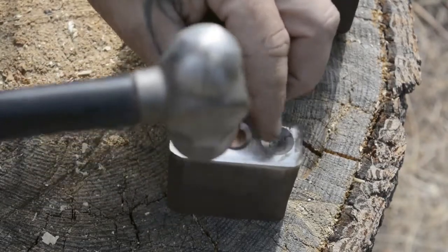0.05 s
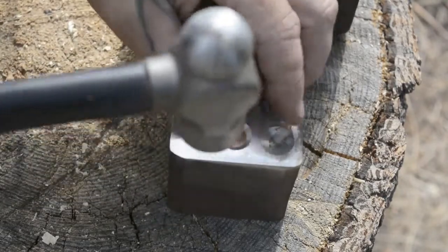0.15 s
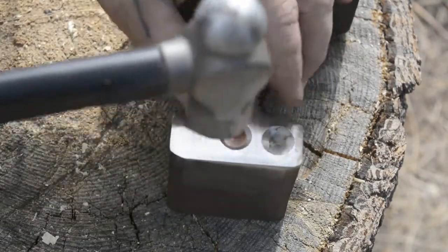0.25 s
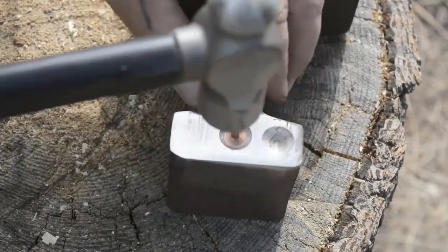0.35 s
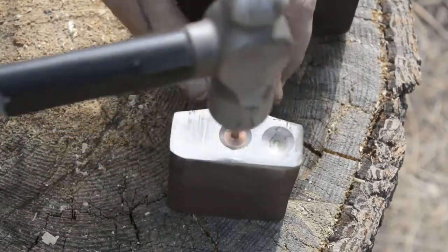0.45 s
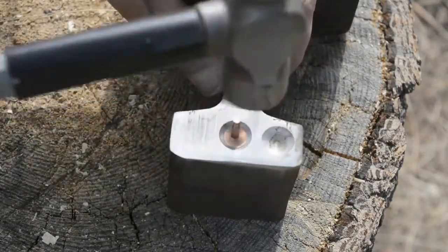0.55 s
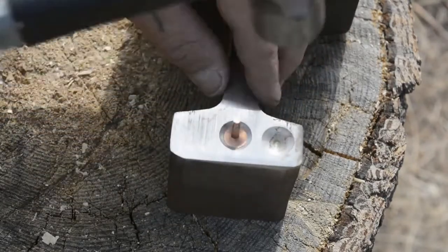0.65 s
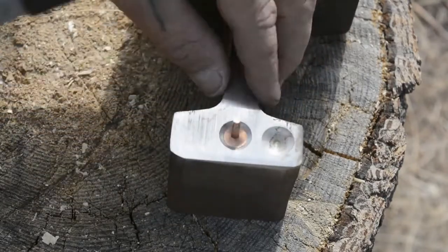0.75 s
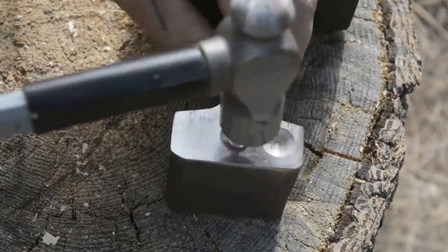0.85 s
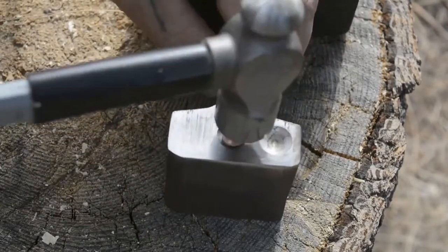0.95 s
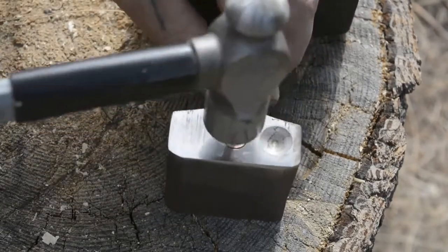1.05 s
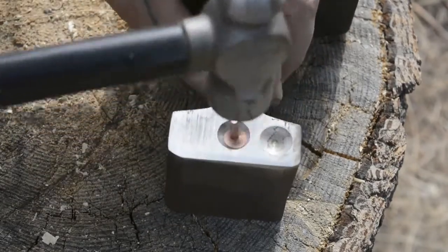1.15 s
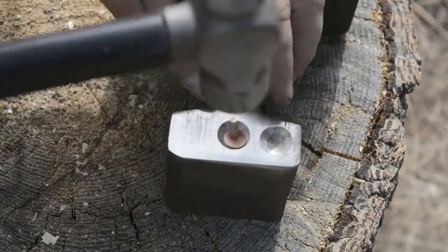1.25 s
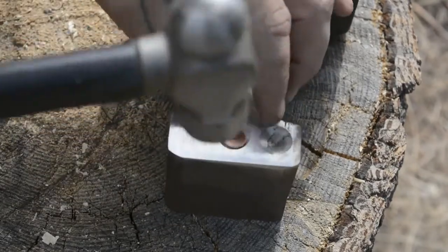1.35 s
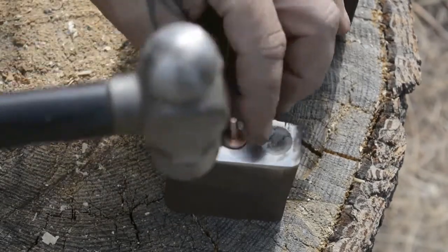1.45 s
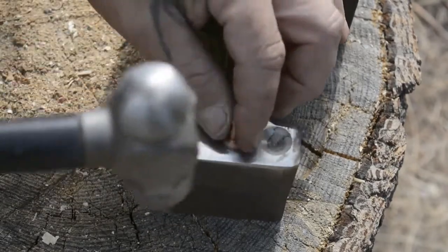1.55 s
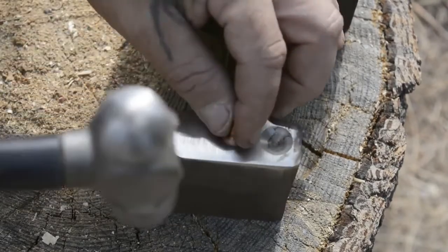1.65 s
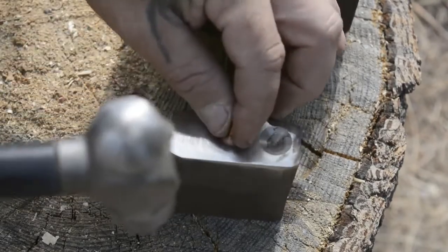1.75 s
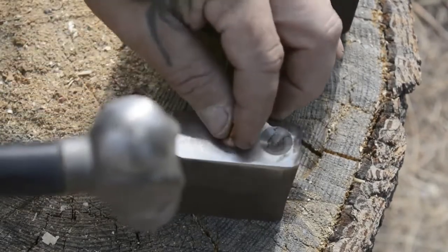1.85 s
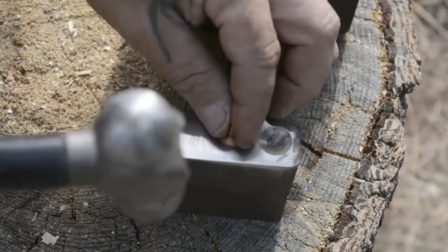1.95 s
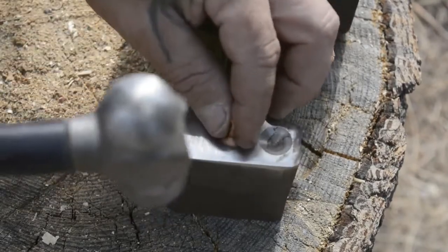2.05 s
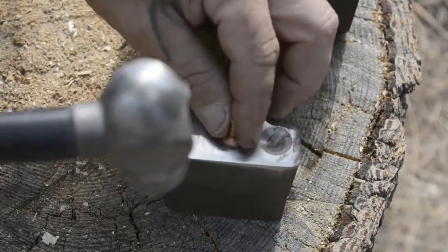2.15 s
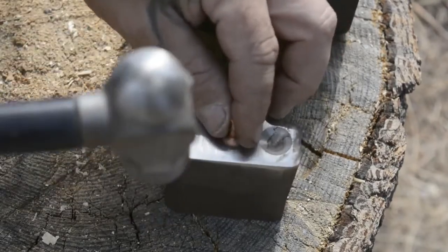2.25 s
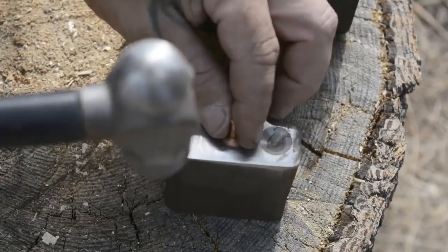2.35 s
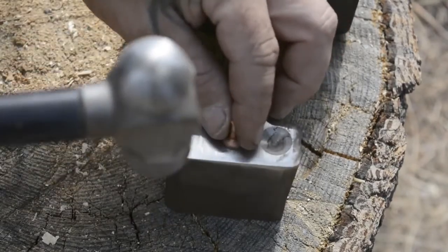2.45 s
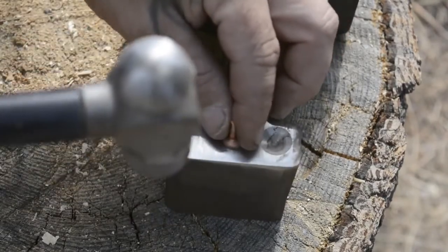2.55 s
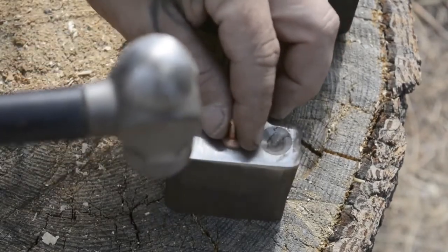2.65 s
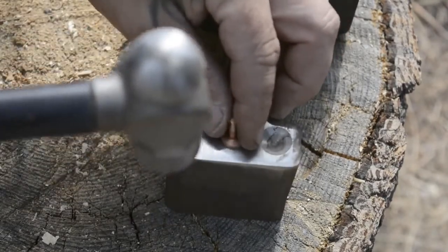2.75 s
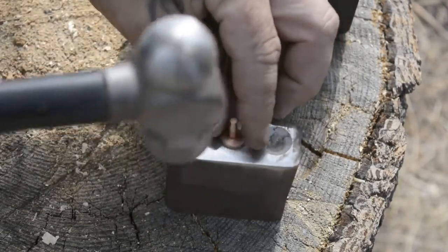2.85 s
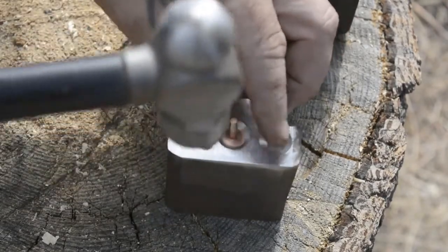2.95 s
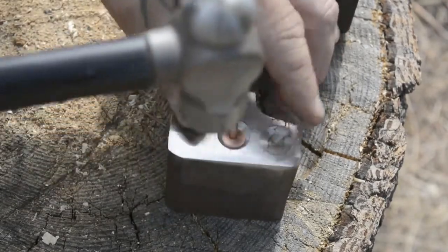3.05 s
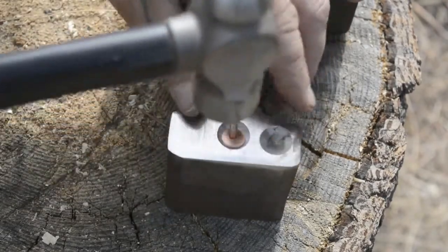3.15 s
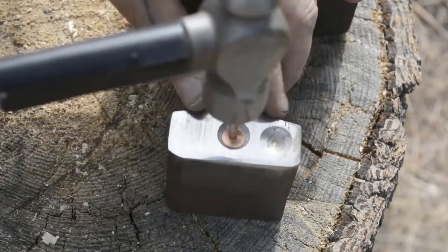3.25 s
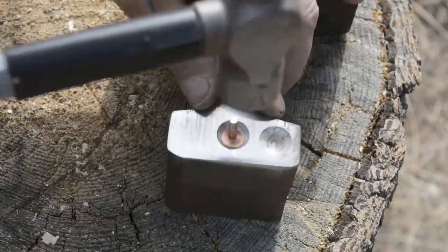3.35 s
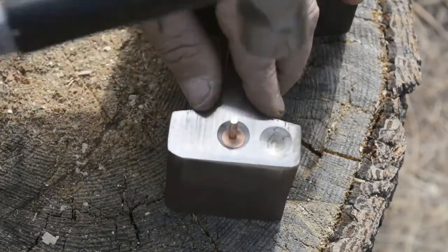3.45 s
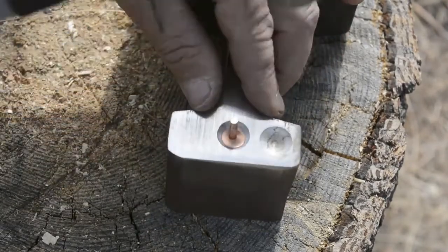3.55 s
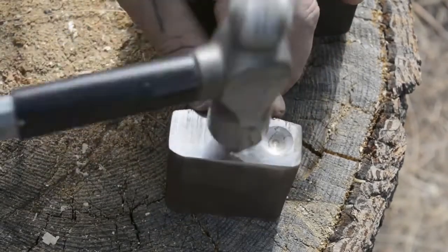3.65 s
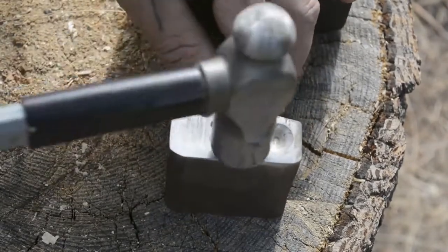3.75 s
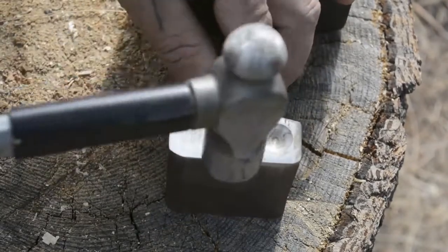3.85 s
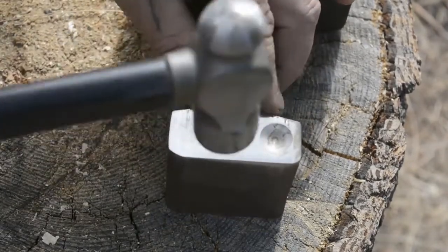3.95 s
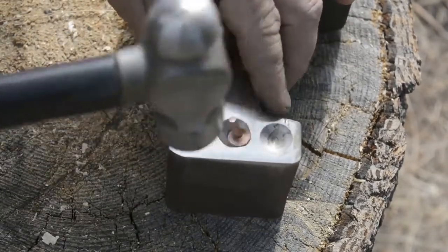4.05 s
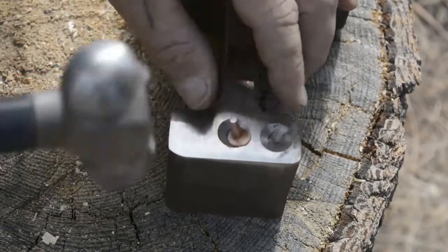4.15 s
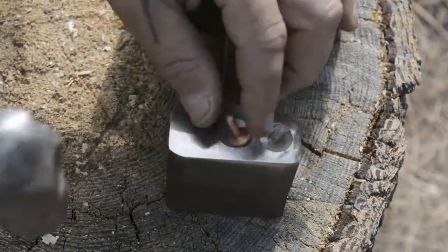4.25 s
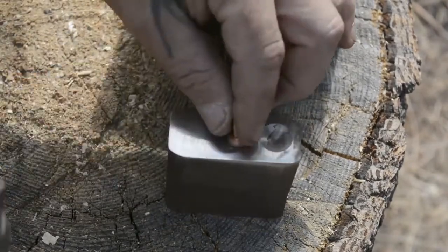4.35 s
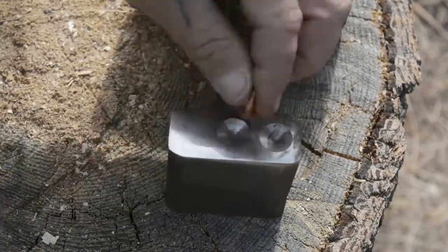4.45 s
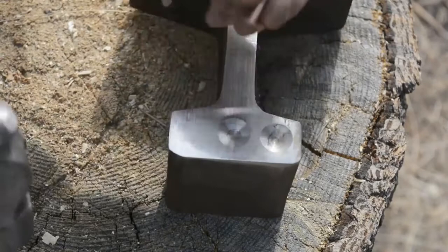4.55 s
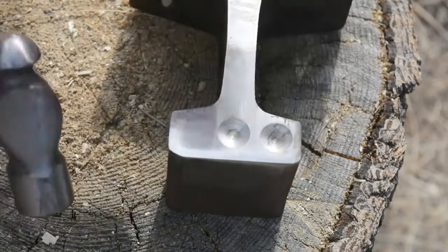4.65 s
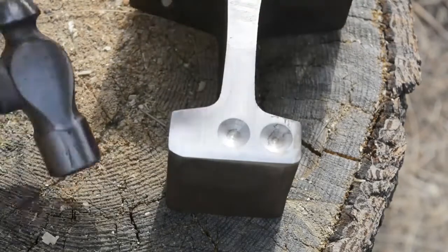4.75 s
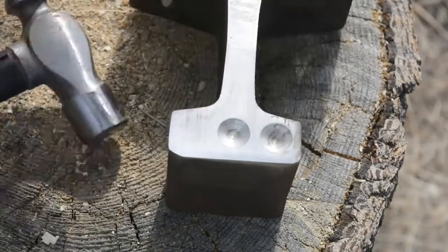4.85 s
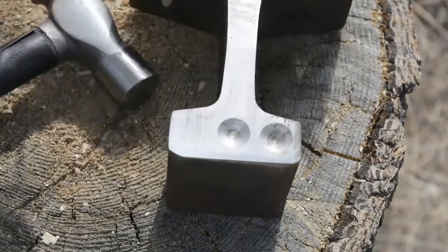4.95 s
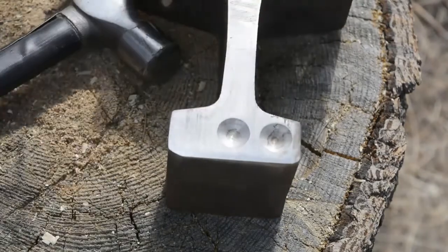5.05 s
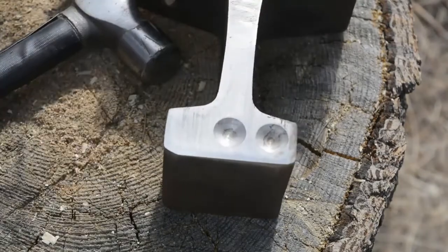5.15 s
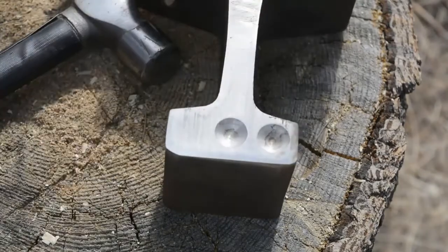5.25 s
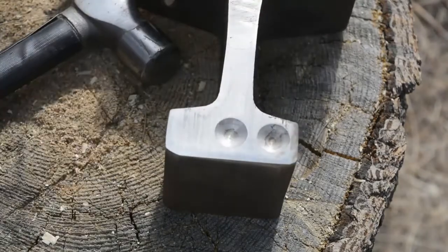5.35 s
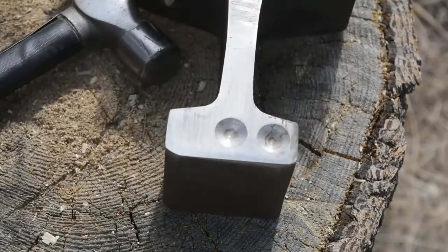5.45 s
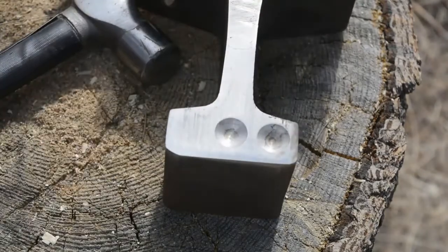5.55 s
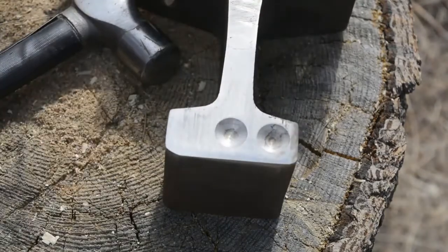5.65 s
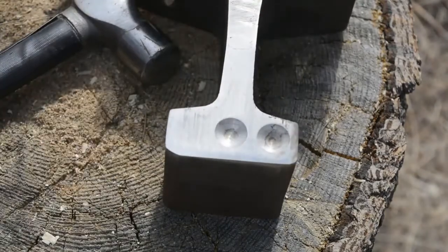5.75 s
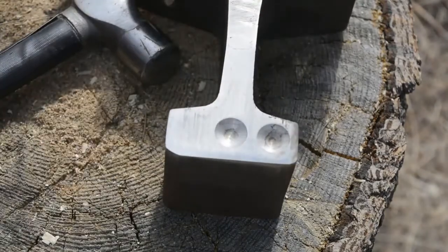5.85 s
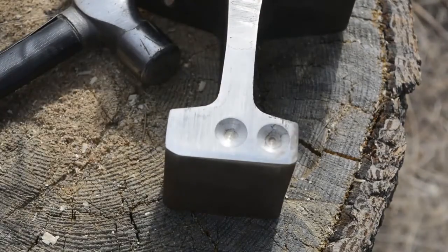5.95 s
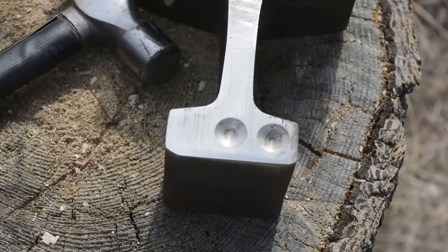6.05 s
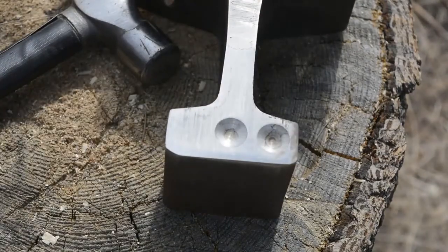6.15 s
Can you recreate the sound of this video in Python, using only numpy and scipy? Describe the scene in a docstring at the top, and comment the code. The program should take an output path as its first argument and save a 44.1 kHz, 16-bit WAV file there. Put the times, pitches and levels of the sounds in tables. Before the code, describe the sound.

A bird whistles faintly, a hammer cracks down twice on a steel block on a stump, then is set down with a knock and long ring.

```python
"""Soft outdoor hiss and a faint whine run throughout, with low bumps; first a far bird whistles, a falling sine.
A steel hammer then strikes a small rivet in a steel block on a tree stump, twice, with a spell of hum after each.
Each blow is a noise crack, damped block and wood modes and a beating hammer ring; the block bounces, the rivet rattles.
Last, the hammer is laid down with knocks and rings freely, and a sleeve rustles as swelling noise."""
import sys
import numpy as np
from scipy import signal
from scipy.fft import rfft, irfft
from scipy.io import wavfile

SR = 44100
rng = np.random.default_rng(int(sys.argv[2]) if len(sys.argv) > 2 else 0)


def wav_out(sig):
    """Save sig, one row per channel (or a flat mono array), as 16-bit PCM at SR to the path in sys.argv[1]."""
    wavfile.write(sys.argv[1], SR, np.round(np.clip(np.atleast_2d(sig).T, -1, 1) * 32767).astype(np.int16))


N = 273420
T = np.arange(N) / SR

# Background air spectrum. Each row: frequency in Hz, relative density in dB per Hz.
AIR = [(12, -61), (20, -1.5), (95, -3.5), (113, -6.5), (145, -6.5), (209, -12), (284, -10.5), (317, -12.5),
       (386, -13.5), (637, -14), (996, -16.5), (2370, -20), (10100, -22), (13700, -21.5), (15800, -23.5)]
# Stereo width of the background. Each row: frequency in Hz, side filter gain in dB.
AIR_SIDE = [(60, -20), (200, -11), (700, -9.5), (2400, -5.5), (8000, -3.5), (15000, -5)]
# Sleeve strokes. Each row: loudest moment in seconds, half length in seconds, level in dB before its flutter.
RUSTLE = [(5.62, .1, -56.5), (5.908, .32, -55), (5.913, .035, -55.5)]
# Sleeve spectrum. Each row: frequency in Hz, relative density in dB per Hz.
SLEEVE = [(500, -7.5), (3000, -17), (9000, -16), (12000, -9.5), (13800, -6), (16000, -9.5)]
# Spells of faint hum. Each row: start in seconds, end in seconds, mean pitch in Hz, fundamental's level in dB.
HUMS = [(1.82, 2.4, 142.3, -59.5), (4.82, 5.446, 144.2, -59)]
# Low bumps at the microphone. Each entry: loudest moment in seconds.
BUMPS = [.331, .375, 3.299, 3.339, 4.299, 5.519]
# Falling whistles of far birds. Each row: loudest moment in seconds, half length in seconds, level in dB,
# pitch curve as points of seconds and Hz.
WHISTLES = [(0.718, .082, -52.5, [(.6, 3350), (.68, 2900), (.75, 2700), (.81, 1850)]),
            (0.61, .07, -61, [(.57, 2020), (.605, 1630), (.72, 1400)])]
# Brief scuffs of metal and wood. Each row: loudest moment in seconds, half length in seconds, level in dB,
# centre in Hz, width in Hz.
SCUFFS = [(3.7135, .003, -47, 4500, 3000), (3.725, 0.0022, -40, 6000, 2000),
          (3.7255, 0.0022, -41, 11000, 4000), (5.745, 0.025, -51, 700, 1500),
          (5.8145, .0012, -46.5, 7000, 5000)]
# Hammer blows. Each row: start in seconds, thud in dB, contact in ms, crack in dB, rivet pitch in Hz,
# rivet width in Hz, rivet level in dB, ring tilt in dB per octave, sideways share of the blow in dB.
BLOWS = [(0.8517, -1, 0.24, -12.5, 5300, 1280, -12.5, 0, -32),
         (3.6688, -2.2, 0.15, -12.5, 5800, 1200, -10.5, -5, -25)]
# The block's hops, one row per blow: first flight in seconds, first landing in dB, loss per bounce in dB,
# first contact in ms.
HOPS = [(0.0503, -8.5, 0.5, 0.61), (0.041, -8.5, 5, 0.76)]
# Block modes on its seat. Each row: frequency in Hz, relative level in dB, t60 in seconds.
BLOCK = [(253, -27, 0.051), (484, -16.5, 0.044), (642, -15.5, 0.042), (794.4, -6.5, 0.042),
         (896, -29.5, 0.077), (1086, -15, 0.04), (1420, -11, 0.018), (1686, -19.5, 0.049)]
# Dead thud of the wood under the block. Each row: frequency in Hz, relative level in dB, t60 in seconds.
THUD = [(379, 0.5, 0.0077), (1202, -7, 0.013), (1880, -14, 0.01)]
# Stump top where the hammer lands. Each row: frequency in Hz, relative level in dB, t60 in seconds.
WOOD = [(500, -31, 0.043), (700, -15, 0.065), (1030, 1.5, 0.005), (1340, -12, 0.0091), (3180, -6.5, 0.0086)]
# Dull knocks as things shift on the stump. Each row: start in seconds, level in dB, pitch in Hz.
KNOCKS = [(5.1398, -29, 500), (5.5445, -41, 890), (5.5748, -28, 160), (5.7488, -31.5, 380)]
# Loud rivet ticks also nudge the block. One row: level in dB, contact in ms.
NUDGE = (-22.5, 0.59)
# Crack spectrum. Each row: frequency in Hz, relative density in dB per Hz.
CRACK = [(1100, 2), (1700, 2), (2400, -1.5), (3200, 0.5), (4200, -14), (7000, -12), (7700, -16), (8500, -3),
         (11000, -6), (13000, -4), (14200, -21), (16000, -28)]
# The rivet's loudest ticks. Each row: start in seconds, level in dB, centre in Hz.
TICKS = [(.8846, -34, 10700), (0.889, -31, 11800), (.8996, -21, 12900), (.959, -27.5, 12400),
         (3.714, -34, 10300)]
# Fainter rivet rattle after each blow. One row: delay in seconds, length in seconds, mean level in dB,
# middle pitch in Hz, width in Hz.
RATTLE = (0.04, 0.06, -41, 9500, 5000)
# Hammer modes. Each row: frequency in Hz, level in dB when struck on the face, level in dB when knocked on the side,
# t60 in seconds in the hand before the grip closes, t60 in seconds lying free, beat in Hz.
HAMMER = [(1710.6, -54, -30.5, 2.1, 1.66, 1.095), (2297, -31.5, -47, 0.85, 3.7, 0.11),
          (4705, -51, -51.5, 0.85, 1.6, 1.45), (5970, -52, -52.5, 2.3, 1.2, 1.14),
          (7192, -41, -63, 0.75, .6, 1.8), (7970, -63, -52, .6, 1.4, 1.4), (9700, -62, -79, .55, .6, 1),
          (11597, -63, -77, .9, .9, 1)]
# The hammer drops back with a glancing, bright touch. One row: start in seconds, sideways level in dB,
# face level in dB, ring tilt in dB per octave.
REBOUND = (3.7262, -16.5, -30, 11)
# The hammer is laid down. One row: start in seconds, knock in dB, ring in dB.
LAY_DOWN = (5.0715, -18.5, 0)
# The laid hammer settles and rings again softly. One row: start in seconds, ring in dB.
SETTLE = (5.5153, -22)

BUMP_DB, JOLT_DB, AIR_DB = -44, -33, -52.5
# each flight is this share of the last, down to the rocking period; each contact is this much longer
RESTITUTION, ROCK_S, SOFTENING = 0.462, 0.0075, 1.34
KNOCK_T60_S, KNOCK_CONTACT_MS = 0.012, 0.17
TICK_WIDTH_HZ = 1400
TOP_HZ = 15850


def undb(db):
    """Decibels to gain."""
    return 10 ** (np.asarray(db) / 20)


def fade(t, t60):
    """Exponential decay, 60 dB down after t60 seconds."""
    return np.exp(-np.log(1000) * t / t60)


def swell(s, half_s):
    """A smooth rise and fall around time s."""
    return np.exp(-((T - s) / half_s) ** 2)


def add(track, s, sound):
    """Mix a sound into the track at time s."""
    i = int(round(s * SR))
    track[i:i + len(sound)] += sound[:N - i]


def colour(x, points):
    """Filter by a spectrum of (Hz, dB) points, joined on a logarithmic frequency axis."""
    hz, db = np.transpose(points)
    f = np.maximum(np.fft.rfftfreq(len(x), 1 / SR), 1)
    gain = undb(np.interp(np.log(f), np.log(hz), db))
    return irfft(rfft(x) * gain, len(x))


def noise(points, size):
    """Coloured noise of rms 1."""
    x = colour(rng.standard_normal(size), points)
    return x / x.std()


def resonance(hz, width_hz):
    """Spectrum points of one steep-sided peak."""
    f = np.geomspace(1000, SR / 2, 128)
    return np.column_stack([f, -20 * np.log10(1 + 2 * ((f - hz) / width_hz) ** 2)])


def air():
    """Steady outdoor air and hiss: independent coloured noise for mid and side."""
    return np.array([undb(AIR_DB) * noise(AIR, size=N) for _ in range(2)])


def sleeve():
    """Cloth strokes: mid and side noise under shared swells with a slow random flutter."""
    strokes = sum(undb(db) * swell(s, half_s) for s, half_s, db in RUSTLE)
    flutter = undb(noise([(30, 5), (150, -46)], size=N))  # the noise is read in dB
    return np.array([strokes * flutter * noise(SLEEVE, size=N) for _ in range(2)])


def whine(whine_db=-72):
    """A faint high whine: noise in a very narrow band."""
    return undb(whine_db) * noise([(13400, -50), (13730, 0), (14060, -50)], size=N)


def background():
    """Air, sleeve and a central whine in stereo; the side signal is stronger in the treble than in the bass."""
    mid, side = air() + sleeve()
    mid = mid + whine()
    side = colour(side, AIR_SIDE)
    return np.array([mid + side, mid - side])


def hum(swell_s=.03, waver=0.0115):
    """Spells of unsteady hum: a fundamental with its second and fourth harmonics."""
    out = np.zeros(N)
    for start, end, hz, db in HUMS:
        pitch = hz * (1 + waver * noise([(5, 7), (30, -42.5)], size=N))
        phase = 2 * np.pi * np.cumsum(pitch) / SR
        gate = np.clip(np.minimum(T - start, end - T) / swell_s, 0, 1)
        tone = np.sin(phase) + undb(-5.5) * np.sin(2 * phase) + undb(-11.5) * np.sin(4 * phase)
        out += undb(db) * gate * tone
    return out


def bumps(bump_hz=34, bump_s=0.012):
    """Soft bumps at the microphone: a low sine under a short swell."""
    return sum(undb(BUMP_DB) * swell(s, bump_s) * np.sin(2 * np.pi * bump_hz * (T - s)) for s in BUMPS)


def birds(waver=0.004):
    """Nearly pure whistles that swell and fade as they slide down."""
    out = np.zeros(N)
    for s, half_s, db, curve in WHISTLES:
        pitch = np.interp(T, *np.transpose(curve))
        pitch = pitch * (1 + waver * noise([(60, -4), (400, -36)], size=N))
        out += undb(db) * swell(s, half_s) * np.sin(2 * np.pi * np.cumsum(pitch) / SR)
    return out


def yard(x, near_db=-23, near_t60=0.18, far_db=-38, far_t60=.45):
    """Ground and trees scatter a short, dull tail of two decays."""
    t = T[:SR // 2]
    dull = [(80, -3), (250, 3.5), (1500, -4), (4000, 2.5), (15000, -26)]
    envelope = np.zeros(len(t))
    for db, t60 in [(near_db, near_t60), (far_db, far_t60)]:
        decay = fade(t, t60)
        envelope += undb(db) * decay / np.linalg.norm(decay)
    return signal.fftconvolve(x, envelope * colour(rng.standard_normal(len(t)), dull))[:N]


def scuffs():
    """The rebounding hammer grazes the rivet; later, things scrape on the stump: brief swells of band noise."""
    out = np.zeros(N)
    for s, half_s, db, hz, width_hz in SCUFFS:
        out += undb(db) * swell(s, half_s) * noise(resonance(hz, width_hz), size=N)
    return out


def jolts(jolt_hz=90, jolt_t60=0.056):
    """A low jolt with each blow: a fast-fading sine."""
    out, t = np.zeros(N), T[:SR // 4]
    for s, *_ in BLOWS:
        add(out, s, undb(JOLT_DB) * fade(t, jolt_t60) * np.sin(2 * np.pi * jolt_hz * t))
    return out


def strike(modes, contact_ms, scatter_db=0):
    """Damped modes pushed by a short contact; a longer contact sounds duller, and each spot favours other modes."""
    t = T[:SR // 4]
    spot = scatter_db * rng.standard_normal(len(modes))
    ring = np.zeros(len(t))
    for (hz, db, t60), extra in zip(modes, spot):
        ring += undb(db + extra) * fade(t, t60) * np.cos(2 * np.pi * hz * t)
    push = t * np.exp(-np.pi * t / (contact_ms / 1000))
    return signal.fftconvolve(ring, push / push.sum())[:len(t)]


def disperse(x, hz, width_hz):
    """All-pass: sound near one frequency leaves the wood a little later."""
    r = np.exp(-np.pi * width_hz / SR)
    a = [1, -2 * r * np.cos(2 * np.pi * hz / SR), r * r]
    return signal.lfilter(a[::-1], a, x)


def bounces(uneven_s=.0012, uneven_db=3.0, count=8):
    """The block lands ever sooner and softer until it only rocks, unevenly: (s, dB, contact ms) of each landing."""
    k = np.arange(count)
    for (s, *_), (flight_s, db, loss_db, contact_ms) in zip(BLOWS, HOPS):
        flights = flight_s * RESTITUTION ** k
        rocking = flights < ROCK_S
        late, hard = rng.uniform(-1, 1, (count, 2)).T * rocking
        times = s + np.cumsum(np.maximum(flights, ROCK_S)) + uneven_s * late
        levels = db - loss_db * k + uneven_db * hard
        yield from zip(times, levels, contact_ms * SOFTENING ** k)


def stump(radiate_hz=180, absorb_hz=2500, bounce_thud_db=-6):
    """Blows and bounces drive the block into the stump; the hammer lands on the wood beside it."""
    block, wood = np.zeros(N), np.zeros(N)
    for s, thud_db, contact_ms, *_ in BLOWS:
        add(block, s, undb(thud_db) * strike(BLOCK + THUD, contact_ms))
    nudge_db, nudge_ms = NUDGE
    for s, *_ in TICKS:
        add(block, s, undb(nudge_db) * strike(BLOCK, nudge_ms))
    # light bounces ring the block but hardly press the wood
    for s, db, contact_ms in bounces():
        ring = strike(BLOCK, contact_ms, scatter_db=3.5)
        thud = undb(bounce_thud_db) * strike(THUD, contact_ms)
        add(block, s, undb(db) * (ring + thud))
    s, knock_db, _ = LAY_DOWN
    add(wood, s, undb(knock_db) * strike(WOOD, contact_ms=0.25))
    for s, db, hz in KNOCKS:
        add(wood, s, strike([(hz, db, KNOCK_T60_S)], KNOCK_CONTACT_MS))
    # wood soaks up the block's treble, and a body this small radiates little bass
    block = signal.sosfilt(signal.butter(4, absorb_hz, fs=SR, output="sos"), block)
    radiation = signal.butter(2, radiate_hz, "high", fs=SR, output="sos")
    return signal.sosfilt(radiation, disperse(block, hz=1395, width_hz=280) + wood)


def rattle(scatter_db=3.0, spread_octaves=.25, count=4):
    """The loose rivet touches its hollow at uneven moments: (s, dB, centre Hz, width Hz) of each touch."""
    delay_s, length_s, db, hz, width_hz = RATTLE
    for s, *_ in BLOWS:
        for k, (when, size, pitch) in enumerate(rng.uniform(-1, 1, (count, 3))):
            touch_s = s + delay_s + length_s * (k + .5 + when / 2) / count
            yield touch_s, db + scatter_db * size, hz * 2 ** (spread_octaves * pitch), width_hz


def rivet(crack_t60=0.0083, tick_t60=0.0056, rise_s=.0001):
    """The rivet cracks under each blow, at a higher pitch as it is squashed shorter, then rattles in its hollow."""
    out, t = np.zeros(N), T[:2048]
    onset = 1 - np.exp(-t / rise_s)
    for s, _, _, crack_db, hz, width_hz, rivet_db, *_ in BLOWS:
        crack = undb(crack_db) * noise(CRACK, size=len(t))
        body = undb(rivet_db) * noise(resonance(hz, width_hz), size=len(t))
        add(out, s, onset * fade(t, crack_t60) * (crack + body))
    ticks = [(*tick, TICK_WIDTH_HZ) for tick in TICKS]
    for s, db, hz, width_hz in ticks + list(rattle()):
        tick = noise(resonance(hz, width_hz), size=len(t))
        add(out, s, undb(db) * onset * fade(t, tick_t60) * tick)
    return out


def hammer_mode(t, hz, t60, beat_hz):
    """A close pair of partials that beat slowly as they fade."""
    return fade(t, t60) * np.sin(2 * np.pi * hz * t) * np.cos(np.pi * beat_hz * t)


def hammer(grip_s=0.35):
    """The hammer rings after each blow until the grip closes on it, and much longer once laid down."""
    out, t = np.zeros(N), T[:2 * SR]
    lay_s, _, lay_db = LAY_DOWN
    rebound_s, graze_db, touch_db, touch_tilt_db = REBOUND
    for hz, face_db, side_db, held_t60, free_t60, beat_hz in HAMMER:
        held = hammer_mode(t, hz, held_t60, beat_hz) * np.exp(-(t / grip_s) ** 2)
        free = hammer_mode(t, hz, free_t60, beat_hz)
        octaves = np.log2(hz / HAMMER[1][0])  # the tilt pivots on the second mode
        for s, *_, tilt_db, sideways_db in BLOWS:
            # a glancing blow also wakes the sideways modes
            size = undb(face_db + tilt_db * octaves) + undb(side_db + sideways_db)
            add(out, s, size * held)
        graze = undb(graze_db + side_db)
        touch = undb(touch_db + face_db + touch_tilt_db * octaves)
        add(out, rebound_s, (graze + touch) * held)
        for s, db in [(lay_s, lay_db), SETTLE]:
            add(out, s, undb(db + side_db) * free)
    return out


def scene():
    """The work, birds, hum and bumps sit in the centre of a wide background."""
    impacts = stump() + rivet() + scuffs()
    low_sounds = hum() + bumps() + jolts()
    return background() + low_sounds + birds() + yard(impacts) + impacts + hammer()


def record(dry):
    """The recorder rounds the highest peaks and cuts the top."""
    rounded = dry / (1 + (dry / .95) ** 4) ** .25
    return signal.sosfilt(signal.ellip(10, .1, 70, TOP_HZ, fs=SR, output="sos"), rounded)


dry = scene()
out = record(dry)
wav_out(out)
```